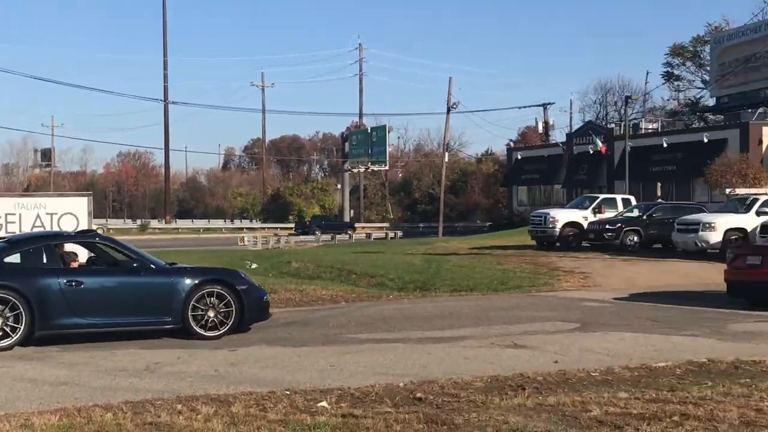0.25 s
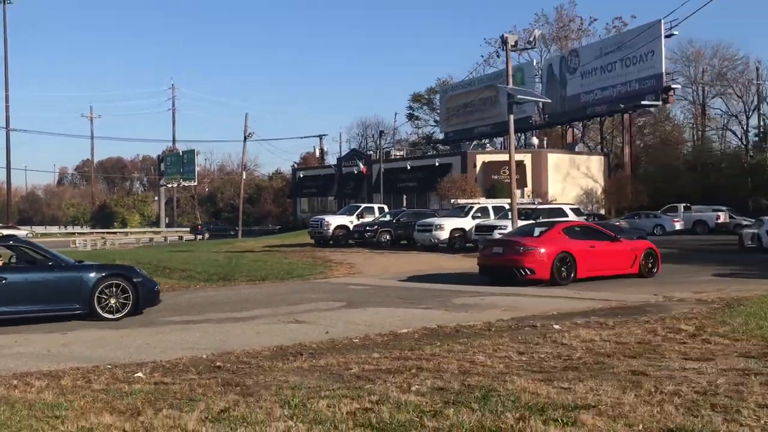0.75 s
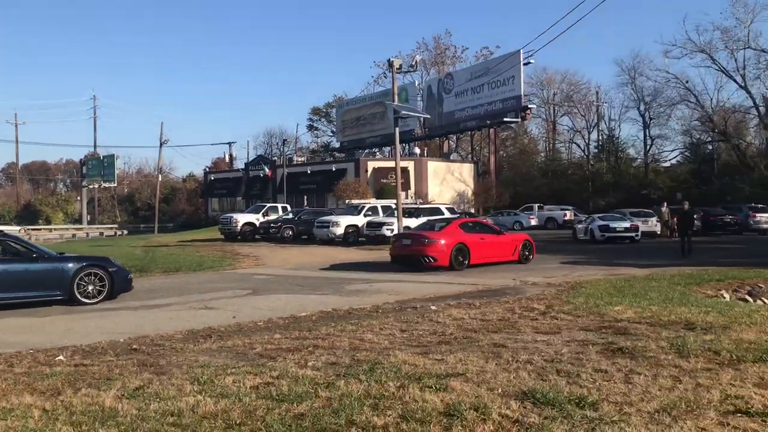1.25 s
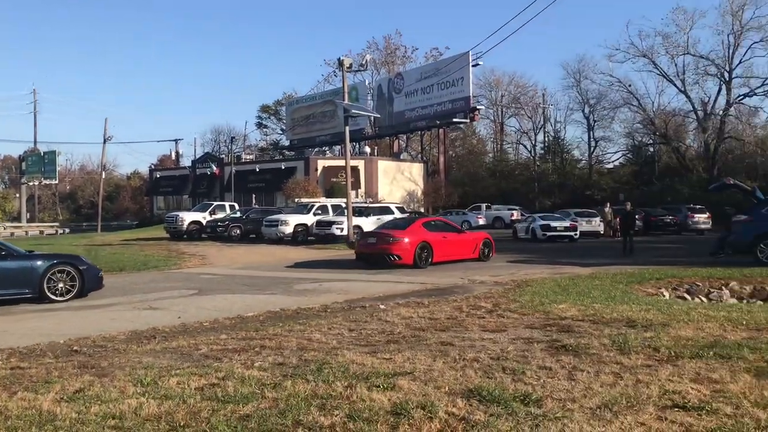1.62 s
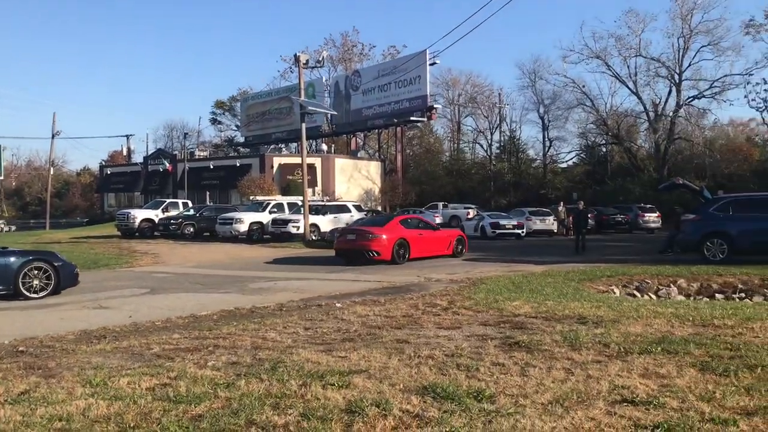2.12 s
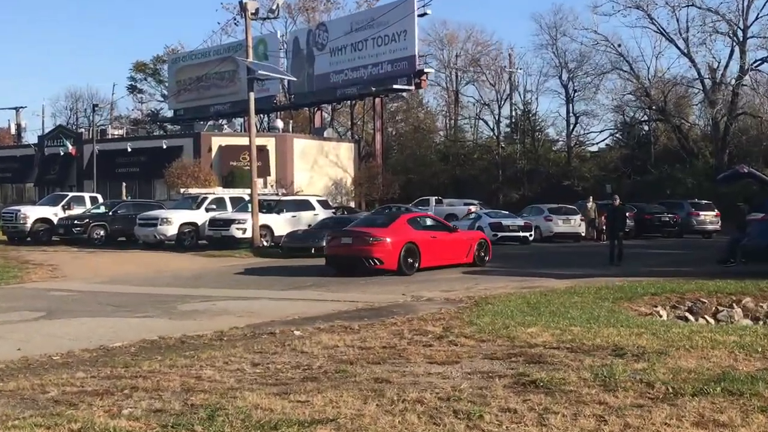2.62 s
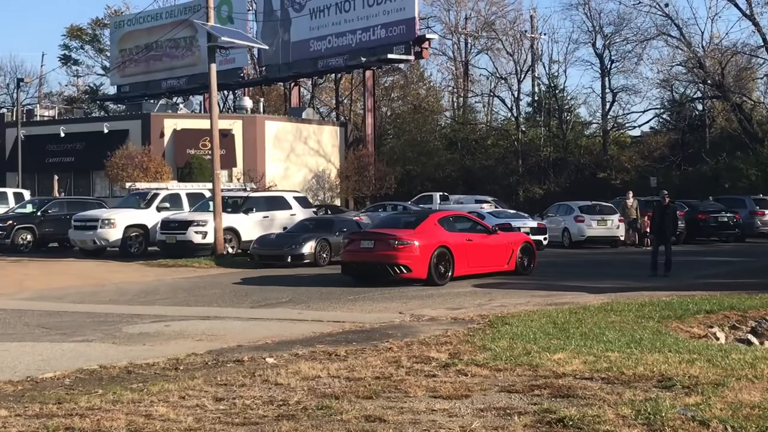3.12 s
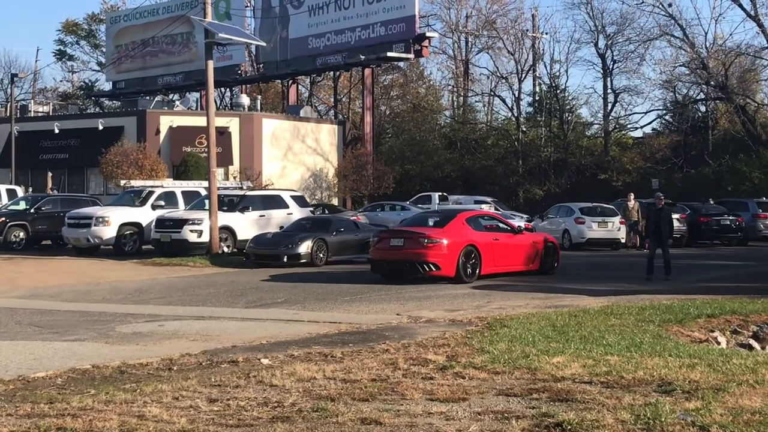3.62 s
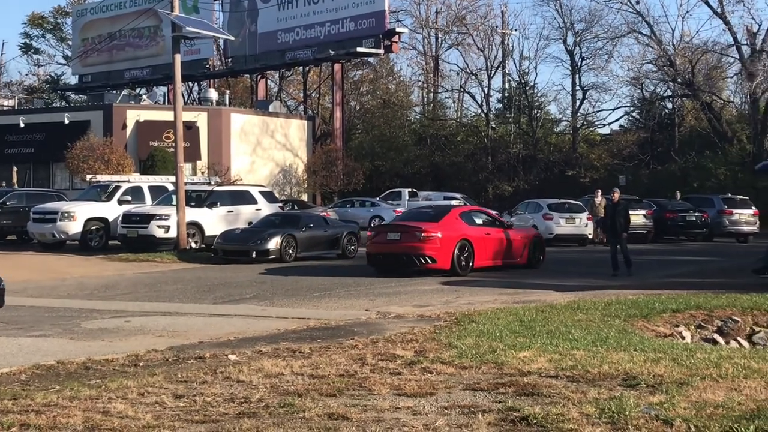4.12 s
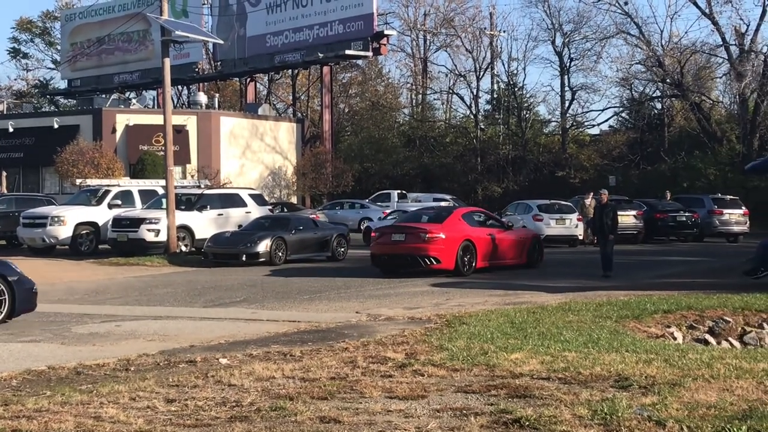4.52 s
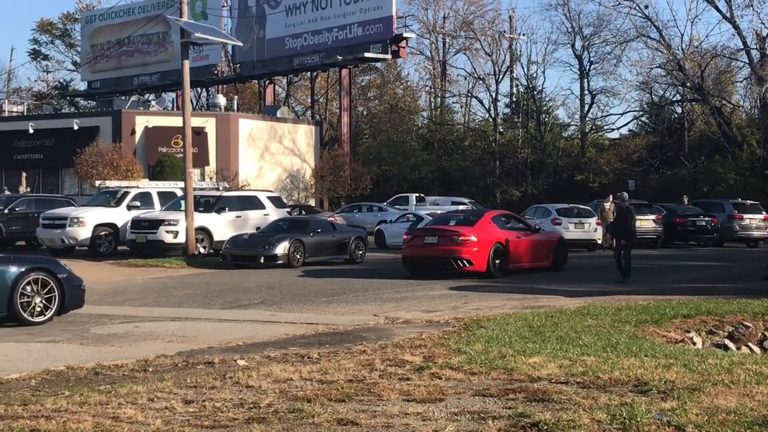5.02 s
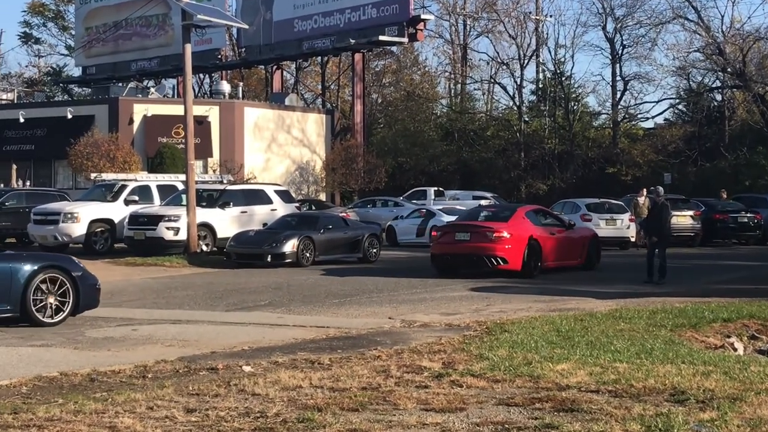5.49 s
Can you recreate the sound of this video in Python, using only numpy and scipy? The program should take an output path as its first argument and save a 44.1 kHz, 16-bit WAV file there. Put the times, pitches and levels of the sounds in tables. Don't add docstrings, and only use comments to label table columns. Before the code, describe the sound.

Outdoors beside a parking lot, a small microphone catches deep exhaust rumble and fast metallic ticking from a nearby sports car. A drone and tyre roar pass first and fade, a second engine blips and settles into a lumpy throb, a thin belt squeal rises midway, and grit snaps occasionally. The drone returns near the end.

```python
import sys
import numpy as np
from scipy import signal
from scipy.io import wavfile

SR = 44100
rng = np.random.default_rng(int(sys.argv[2]) if len(sys.argv) > 2 else 0)


def voltage_ratio(level):
    return 10 ** (np.asarray(level, float) / 20)


def log_audio(samples):
    frames = np.atleast_2d(samples).T
    limited = np.clip(frames, -1, 1)
    pcm = np.round(limited * 32767).astype(np.int16)
    wavfile.write(sys.argv[1], SR, pcm)


N = 253575

# (time [s], half firing rate [Hz], level [dB], load [0 idle, 1 pulling, 2 stabbed])
FLAT_SIX_TRACK = [(0.0, 22.8, -44, .3), (0.36, 23.5, -42, .2), (1.0, 22.9, -42.5, 0), (1.44, 23.1, -41, .6),
                  (1.8, 22.5, -44, 1), (2.52, 20.9, -39, .55), (2.7, 24.5, -39, .8), (2.88, 26.0, -34.5, 1),
                  (3.06, 23.7, -30, 1.1), (3.24, 21.9, -29.5, 1), (3.6, 21.8, -32.5, 1),
                  (3.96, 22.8, -40.5, .9), (4.2, 23.4, -58, .6), (4.5, 23.9, -60, .3),
                  (4.75, 23.1, -43, 1.6), (5.04, 22.1, -39.5, .8), (5.4, 20.5, -35, 1.9),
                  (5.75, 27, -39, 2)]
# (multiple [-], level re leading order [dB])
FLAT_SIX_WEAK_ORDERS = [(2.5, -9), (3.5, -25), (5, -8.5), (6, -11), (8, -13.5), (10, -11)]
CYLINDER_TICK_DB = [0, -7.5, -2.5, -8.5, -1, -6.5]
# (time [s], level [dB])
BAY_NEARNESS = [
    (0, -1.5),
    (1.36, 1.5),
    (1.63, 2),
    (2.67, 2),
    (3.4, 2),
    (3.8, 0),
    (4.32, 2),
    (4.8, 3),
    (5.45, -15),
    (5.75, -0.5),
]
# (centre [Hz], width [Hz], level [dB])
VALVE_MODES = [(3770, 190, -2), (3520, 120, -2), (3245, 140, -5), (4150, 160, -4.5), (5170, 240, -11.5),
               (7120, 230, -8.5), (1970, 110, -12.5)]
# (centre [Hz], width [Hz], level [dB])
BELT_MODES = [(8470, 370, 3), (9200, 240, -7), (8170, 360, 1), (11900, 1200, -13)]
# (frequency [Hz], level per Hz [dB])
AIR_SPECTRUM = [(1470, -31), (2500, 1), (3270, -3.5), (3830, 2), (4970, -2), (7680, -5.5), (8480, -5.5),
                (10400, -12.5), (12300, -15.5), (15500, -16)]
# (time [s], firing rate [Hz], level [dB])
BLIPPER_TRACK = [(1.36, 46.8, 1), (1.52, 50, -7), (1.62, 54.5, -1.5), (1.8, 59.9, -2), (1.98, 62.7, 0),
                 (2.3, 60.9, .5), (2.46, 59.6, -2), (2.74, 57.2, 2.5), (3.04, 51.3, 3.5), (3.24, 50.2, -1),
                 (3.6, 49.0, 0), (3.96, 47.7, 0), (4.14, 47.4, 3), (4.32, 46.9, 1.5), (4.5, 45.9, -2),
                 (4.68, 46.5, 0), (5.04, 47.2, -1), (5.75, 48.0, -2.5)]
# (multiple [-], level re leading order [dB])
BLIPPER_WEAK_ORDERS = [(1.749, -23), (2.498, -21.5), (4, -21.5)]
# (frequency [Hz], gain [dB])
BLIPPER_PIPE_GAIN = [(45, -39), (61, -25.5), (97, -35.5), (118, -47), (165, -42), (200, -45.5), (287, -54),
                     (345, -60)]
# (centre [Hz], width [Hz], level [dB])
TAILPIPE_MODES = [(224, 26, 0), (287, 26, -1), (178, 22, -5)]
BANK_PULSE_DB = [-14, -9, -4, -10, -17, -17, 0, -7]
BANK_PULSE_SIGN = [1, -1, -1, 1, -1, 1, 1, -1]
# (time [s], third of the drone [Hz], level [dB])
DRONE_TRACK = [(0.0, 45.1, -21.5), (0.18, 44.1, -21), (0.28, 38.6, -22), (0.58, 40.2, -22),
               (0.9, 37.7, -34), (1.26, 36.9, -41), (2.45, 36.6, -38.5), (2.58, 40.2, -30),
               (2.68, 40.5, -23.5), (3.06, 40.2, -27.5), (3.42, 36.4, -34), (3.6, 36.1, -43),
               (4.32, 35.5, -37.5), (4.86, 37.7, -43), (5.04, 37.9, -51), (5.25, 41.4, -22.5),
               (5.58, 44.7, -26.5), (5.75, 45.0, -29)]
# (multiple [-], level re leading order [dB])
DRONE_WEAK_ORDERS = [(4, -28)]
# (frequency [Hz], level per Hz [dB])
RUMBLE_SPECTRUM = [(18, -18), (30, -10), (69, -5.5), (97, -2.5), (189, -12), (290, -8), (428, -33.5),
                   (600, -19.5), (780, -42.5), (1320, -120)]
# (time [s], peak [dB], centre [Hz], width as share of centre [-])
GRIT_SNAPS = [(1.513, -52, 3000, .8), (1.7605, -30, 3000, .5), (1.7604, -32, 900, 1.0),
              (2.300, -46, 3300, .12), (2.335, -45, 3700, .12), (2.517, -50, 3600, .8),
              (2.796, -42, 3450, .12), (2.886, -49, 5100, .3), (3.663, -44, 5000, 1.2),
              (3.804, -40, 5800, .25), (3.822, -45, 5000, .5), (5.431, -45, 11000, .45),
              (5.445, -50, 11800, .2)]
# (frequency [Hz], level per Hz [dB])
NEAR_ROAR_SPECTRUM = [(470, -33), (800, -8.5), (1040, 0.5), (1500, -8), (2020, -10), (2560, -12.5),
                      (2960, -15), (3580, -16.5), (4740, -21.5), (7000, -24.5), (9100, -64), (15400, -120)]
# (frequency [Hz], level per Hz [dB])
HIGHWAY_SPECTRUM = [(220, -47), (380, -4), (498, -10.5), (554, -9), (678, -5), (797, -1), (944, 1.5),
                    (1070, -4), (1190, -3), (1530, -15.5), (1660, -8.5), (2400, -20.5), (3120, -36),
                    (5280, -120)]


def flat_six_exhaust(turns, level_db, load):
    stab_db = 19 * swell(5.5, .19, 0, .25)
    fourth_db = level_db + 8 - 13 * load
    second_db = level_db + 5 - 9 * np.minimum(load, 1) + stab_db + deep_dip_db()
    levels_db = [fourth_db, level_db, second_db]
    return exhaust(turns, (4, 3, 2), levels_db, FLAT_SIX_WEAK_ORDERS, flicker_db=.8)


def valve_gear(ticks, bay_db):
    return voltage_ratio(-63 + bay_db) * rattle(ticks, VALVE_MODES, steady=2.4)


def belt_chirr(ticks, bay_db):
    wakes_s = 0.45
    level_db = -68 + 0.12 * bay_db + 5.5 * belt_slip()
    return voltage_ratio(level_db) * np.minimum(seconds() / wakes_s, 1) * rattle(ticks, BELT_MODES, steady=0.22)


def belt_squeal(firings, ticks):
    slip = belt_slip()
    slip_hz = 8520 + 220 * (seconds() - 2.62)
    hops = rng.uniform(-1, 1, (2, N // 100))[:, firings.astype(int)]
    voices = [   # (pitch [Hz], level [dB], width [Hz])
        (slip_hz - 300 + 500 * hops[0], -64.5, 140),
        (slip_hz + 230 + 250 * hops[1], -62.5, 120),
        (5270 + 40 * drift(9), -64, 100)]
    out = 0
    for pitch_hz, level_db, width_hz in voices:
        lowpass = signal.butter(2, width_hz, fs=SR, output="sos")
        a, b = signal.sosfilt(lowpass, rng.standard_normal((2, N)))
        phase = 2 * np.pi * np.cumsum(pitch_hz) / SR
        whistle = a * np.cos(phase) + b * np.sin(phase)
        out = out + voltage_ratio(level_db) * rms_one(whistle * (2.1 + rms_one(ticks)))
    range_db = 14
    return out * voltage_ratio(range_db * (slip - 1)) * np.minimum(10 * slip, 1)


def belt_catch():
    start_s, rise_hz_per_s = 3.15, 6500
    hz = np.clip(7600 + rise_hz_per_s * (seconds() - start_s), 0, SR / 2)
    phase = 2 * np.pi * np.cumsum(hz + 120 * drift(60)) / SR
    return voltage_ratio(-59 + 4 * drift(40)) * swell(start_s, .03, .1, .05) * np.sin(phase)


def engine_air(ticks, bay_db, roar_db):
    puff_db = 2.5 * swell(2.59, .15, 0.3, .4)
    turn_db = 6 * swell(5.55, .25, 1, 1)
    level_db = -57.5 + 0.034 * bay_db + 0.23 * (roar_db - roar_db.min()) + puff_db + turn_db
    return voltage_ratio(level_db) * coloured(AIR_SPECTRUM, patchy_db=1.5) * rms_one(8.9 + rms_one(ticks))


def blipper_exhaust(turns, hz, level_db):
    pipe_hz, pipe_db = np.transpose(BLIPPER_PIPE_GAIN)
    mouth_db = 10 * swell(3.55, 1.0, .4, .25)
    levels_db = []
    for multiple, extra_db in [(1, deep_dip_db()), (2, 0), (3, 0), (6, mouth_db)]:
        gain_db = np.interp(np.log(multiple * hz), np.log(pipe_hz), pipe_db)
        levels_db.append(level_db + gain_db + extra_db)
    arrives = np.clip((seconds() - 1.3) / .2, 0, 1)
    return arrives * exhaust(turns, (1, 2, 3, 6), levels_db, BLIPPER_WEAK_ORDERS, flicker_db=1.3)


def blipper_throb(turns):
    pulses = firing_gate(turns, BANK_PULSE_DB, rise=.02, decay=.04, scatter_db=1.5)
    pulses = pulses * np.array(BANK_PULSE_SIGN)[turns.astype(int) % 8]
    pull_db = 13.5 * swell(1.52, .12, .9, .4)
    idle_db = 4 * swell(2.95, .55, 1.7, .55)
    return voltage_ratio(-51 + pull_db + idle_db) * through_modes(pulses, TAILPIPE_MODES)


def drone_exhaust(hz, level_db):
    rasp_db = -55 + 11.5 * swell(.1, .22, .9, .5)
    levels_db = [level_db, -23 + .55 * level_db, rasp_db]
    return exhaust(turns_of(hz, wobble=.002), (3, 2, 5), levels_db, DRONE_WEAK_ORDERS, flicker_db=.9)


def exhaust_rumble(drone_db):
    level_db = -35.5 + 0.071 * (drone_db - drone_db.mean())
    return voltage_ratio(level_db) * coloured(RUMBLE_SPECTRUM, patchy_db=1.33)


def grit():
    out, t = np.zeros(N), np.arange(400) / SR
    noises = rng.standard_normal((len(GRIT_SNAPS), 400))
    for (time_s, peak_db, hz, share), noise in zip(GRIT_SNAPS, noises):
        snap = (.5 * noise + 4 * (t == 0)) * np.exp(-t / .0005)
        snap = resonance(resonance(snap, hz, share * hz), hz, share * hz)
        lowpass = signal.butter(2, min((1 + share) * hz, 15000), fs=SR, output="sos")
        snap = signal.sosfilt(lowpass, snap)
        at = round(time_s * SR)
        out[at:at + 400] += voltage_ratio(peak_db) * snap / np.abs(snap).max()
    return out


def near_roar(roar_db):
    return voltage_ratio(roar_db) * coloured(NEAR_ROAR_SPECTRUM, patchy_db=-0.5)


def highway_roar():
    level_db = passing(closest_s=0.45, spread_s=0.55, closest_db=-43.5, steady_db=-49)
    return voltage_ratio(level_db) * coloured(HIGHWAY_SPECTRUM, patchy_db=1.4, count=5)


def whine():
    return voltage_ratio(-92 + 3 * drift(3)) * np.sin(2 * np.pi * 14000 * seconds())


def deep_dip_db():
    return -17 * swell(4.45, .22, .03, .35)


def belt_slip():
    return swell(2.62, .4, .56, .22)


def turns_of(hz, wobble):
    return np.cumsum(hz * (1 + wobble * drift(6.2))) / SR


def exhaust(turns, multiples, levels_db, weak_orders, flicker_db):
    lines = [(k, db, flicker_db) for k, db in zip(multiples, levels_db)]
    lines += [(k, levels_db[0] + db, 2 * flicker_db) for k, db in weak_orders]
    out = 0
    for multiple, level_db, spread_db in lines:
        gain = np.sqrt(2) * voltage_ratio(level_db + spread_db * drift(6.6))
        out = out + gain * np.sin(2 * np.pi * (multiple * turns + rng.random()))
    return out


def firing_gate(firings, pattern_db, rise, decay, scatter_db):
    count, since = firings.astype(int), firings % 1
    strength_db = np.array(pattern_db)[count % len(pattern_db)]
    strength_db = strength_db + scatter_db * rng.standard_normal(N // 100)[count]
    return voltage_ratio(strength_db) * (1 - np.exp(-since / rise)) * np.exp(-since / decay) * (1 - since)


def rattle(gate, modes, steady):
    return through_modes(rng.standard_normal(N) * (steady + rms_one(gate)), modes)


def through_modes(x, modes):
    out = 0
    for k, (hz, width_hz, level_db) in enumerate(modes):
        width_hz = 1.26 * width_hz
        out = out + (-1) ** k * voltage_ratio(level_db) * resonance(resonance(x, hz, width_hz), hz, width_hz)
    return rms_one(out)


def resonance(x, hz, width_hz):
    r = np.exp(-np.pi * width_hz / SR)
    zeros = np.array([1, 0, -1]) * (1 - r * r) / 2
    poles = [1, -2 * r * np.cos(2 * np.pi * hz / SR), r * r]
    return signal.lfilter(zeros, poles, x)


def coloured(spectrum, patchy_db, count=3):
    hz, level_db = np.transpose(spectrum)
    edges_hz = hz[0] * 2 ** np.arange(0, np.log2(hz[-1] / hz[0]) + 1 / count, 1 / count)
    settle = SR // 4
    white, out = rng.standard_normal((2, N + settle)), 0
    for k, (low, high) in enumerate(zip(edges_hz, np.minimum(edges_hz[1:], .45 * SR))):
        band_db = np.interp(np.log(low * high) / 2, np.log(hz), level_db)
        if band_db > -55:
            bandpass = signal.butter(2, [low, high], "band", fs=SR, output="sos")
            band = signal.sosfilt(bandpass, white[k % 2])[settle:]
            out = out + band * voltage_ratio(band_db + patchy_db * drift(14.2))
    return rms_one(out)


def passing(closest_s, spread_s, closest_db, steady_db):
    near = 1 / (1 + ((seconds() - closest_s) / spread_s) ** 2)
    return 10 * np.log10(voltage_ratio(2 * closest_db) * near + voltage_ratio(2 * steady_db))


def swell(start_s, attack_s, hold_s, release_s):
    return np.interp(seconds(), np.cumsum([start_s, attack_s, hold_s, release_s]), [0, 1, 1, 0])


def drift(rate):
    r = np.exp(-80 * np.pi * rate / SR)
    slow = signal.lfilter([1], [1, -2 * r, r * r], rng.standard_normal(N // 40 + 2002))[2000:]
    return np.interp(np.arange(N) / 40, np.arange(len(slow)), rms_one(slow))


def in_time(rows):
    time_s, *columns = np.transpose(rows)
    return [np.interp(seconds(), time_s, c) for c in columns]


def seconds():
    return np.arange(N) / SR


def rms_one(x):
    return x / np.sqrt(np.mean(x ** 2) + 1e-20)


def scene():
    six_hz, six_db, load = in_time(FLAT_SIX_TRACK)
    blip_hz, blip_db = in_time(BLIPPER_TRACK)
    drone_hz, drone_db = in_time(DRONE_TRACK)
    bay_db, = in_time(BAY_NEARNESS)
    roar_db = passing(closest_s=0.23, spread_s=0.23, closest_db=-43.5, steady_db=-53.5)
    six_turns, blip_turns = turns_of(six_hz, wobble=.001), turns_of(blip_hz, wobble=.001)
    firings = 2 * six_turns + .2
    ticks = firing_gate(firings, CYLINDER_TICK_DB, rise=.1, decay=.45, scatter_db=1.8)

    exhaust_gain = voltage_ratio(.6)
    out = exhaust_gain * flat_six_exhaust(six_turns, six_db, load)
    out += valve_gear(ticks, bay_db)
    out += belt_chirr(ticks, bay_db) + belt_squeal(firings, ticks) + belt_catch()
    out += engine_air(ticks, bay_db, roar_db)
    out += exhaust_gain * blipper_exhaust(blip_turns, blip_hz, blip_db)
    out += blipper_throb(blip_turns)
    out += exhaust_gain * drone_exhaust(drone_hz, drone_db)
    out += exhaust_rumble(drone_db)
    out += grit()
    out += near_roar(roar_db) + highway_roar() + whine()
    return out[None]


def roll_off(x):
    return signal.sosfilt(signal.butter(12, 15640, fs=SR, output="sos"), x)


def record(dry):
    mix = signal.sosfilt(signal.butter(6, 33, "high", fs=SR, output="sos"), dry)
    return roll_off(mix)


dry = scene()
out = record(dry)
log_audio(out)
```